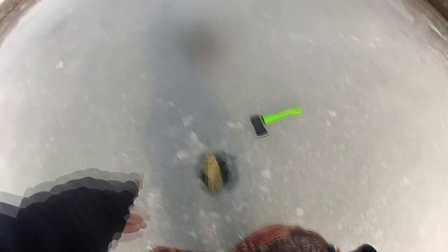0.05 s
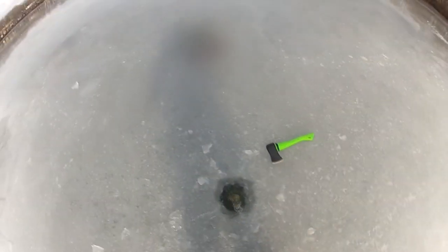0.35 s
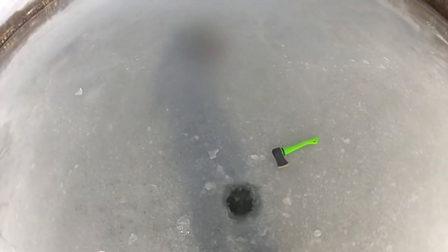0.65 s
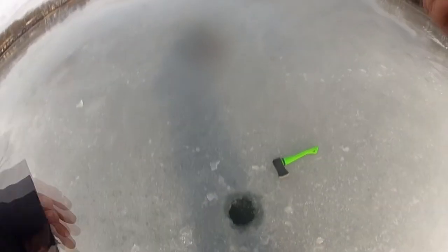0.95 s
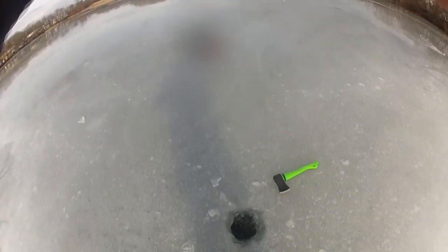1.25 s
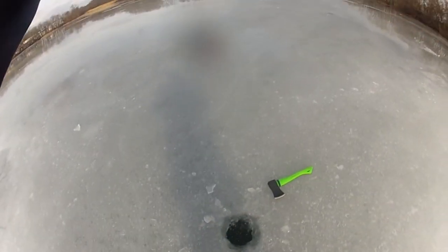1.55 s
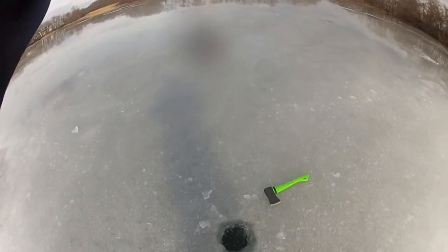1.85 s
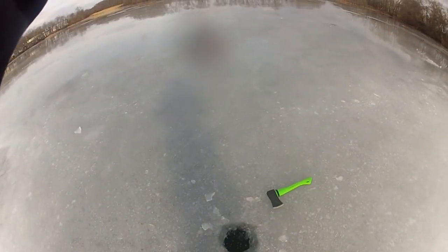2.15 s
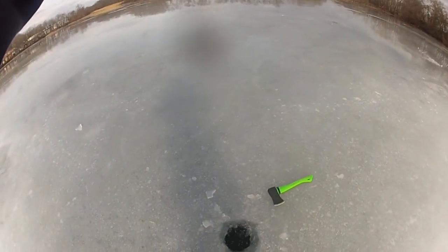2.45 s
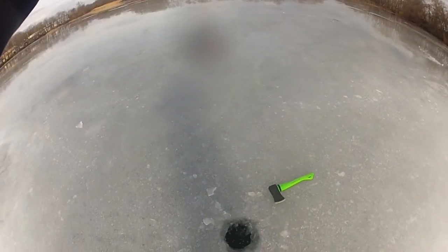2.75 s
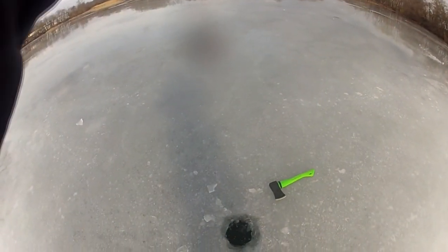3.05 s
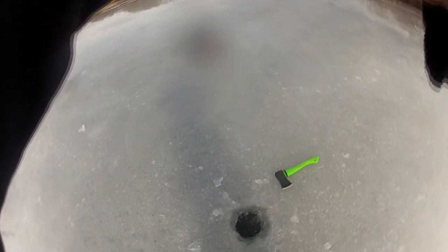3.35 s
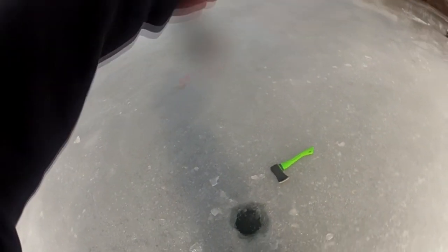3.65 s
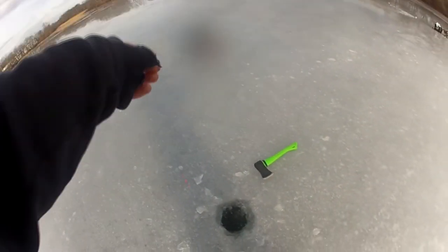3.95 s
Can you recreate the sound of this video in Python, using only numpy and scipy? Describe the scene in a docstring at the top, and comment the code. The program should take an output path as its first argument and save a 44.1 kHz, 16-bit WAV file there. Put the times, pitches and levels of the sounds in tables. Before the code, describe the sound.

One short, sloshing splash sounds as a fish drops through a hole in pond ice. Droplets patter down and thin out, leaving low, gusty wind buffeting the microphone over a faint distant hiss.

```python
"""Frozen pond, at a hole in the ice. A fish is let go: it slaps the water, the cavity sloshes and gulps,
spray patters down and a few drips follow. Wind buffets the body-worn microphone throughout, over a far
roar and hiss; a faint bird calls once, a low tone swells and a bump knocks the microphone.
The recorder clips on the strongest buffets and holds each sample at a low rate,
which mirrors the sound into the treble."""
import sys
import numpy as np
from scipy import signal
from scipy.fft import rfft, irfft
from scipy.io import wavfile
from scipy.ndimage import uniform_filter1d

SR = 44100
rng = np.random.default_rng(int(sys.argv[2]) if len(sys.argv) > 2 else 0)


def int16_out(signal):
    """Quantize to a 16-bit WAV file."""
    q = np.round(np.clip(np.atleast_2d(signal).T, -1, 1) * 32767)
    wavfile.write(sys.argv[1], SR, q.astype(np.int16))


N = 176400
T = np.arange(N) / SR
HZ = np.maximum(np.arange(N // 2 + 1) * SR / N, 1)
HOLD_RATE_HZ = 12000


def from_db(db):
    """Decibels to gain."""
    return 10 ** (np.asarray(db) / 20)


def unit_rms(x):
    """Scale to rms 1."""
    return x / np.sqrt(np.mean(x ** 2) + 1e-20)


def curve(rows):
    """Linear interpolation of (time_s, value) rows."""
    return np.interp(T, *np.transpose(rows))


def coloured(x, colour, tilt_db_per_octave=0):
    """Filter by (freq_hz, gain_db) rows plus a tilt; rms 1."""
    hz, db = np.transpose(colour)
    shape_db = np.interp(np.log(HZ), np.log(hz), db) + tilt_db_per_octave * np.log2(HZ)
    return unit_rms(irfft(rfft(x) * from_db(shape_db), N))


def noise():
    """White noise."""
    return rng.standard_normal(N)


def narrow_noise(hz, width_hz):
    """Gaussian band of noise; rms 1."""
    band = np.exp(-0.5 * ((HZ - hz) / (width_hz / 2)) ** 2)
    return unit_rms(irfft(rfft(noise()) * band, N))


def evened(x, window_s):
    """Divide by the running rms to flatten chance swells."""
    size = max(int(window_s * SR), 3)
    power = uniform_filter1d(uniform_filter1d(x ** 2, size), size)
    return x / np.sqrt(np.abs(power) + 1e-12)


def swell(middle_s, length_s):
    """Bell-shaped envelope."""
    return np.exp(-np.minimum((2 * (T - middle_s) / length_s) ** 2, 40))


def burst(start_s, decay_ms):
    """Instant attack, exponential decay."""
    return (T >= start_s) * np.exp(-np.clip((T - start_s) * 1000 / decay_ms, 0, 40))


def bubble(start_s, hz, t60_s):
    """Ringing air pocket: a damped sine that climbs in pitch."""
    rise_per_t60, attack_s = 0.087, 0.00052
    age_s = np.clip(T - start_s, 0, 2 * t60_s)
    phase = 2 * np.pi * hz * age_s * (1 + rise_per_t60 * age_s / t60_s / 2)
    return np.sin(phase) * from_db(-60 * age_s / t60_s) * (1 - np.exp(-age_s / attack_s))


def wind():
    """Fluttering rumble of wind on the microphone port."""
    # time_s, level_db
    strength = [(0, -25), (0.15, -31), (0.3, -31), (0.45, -26), (0.7, -20.5), (0.88, -31), (1.1, -23.5),
                (1.27, -25), (1.55, -22.5), (1.9, -17), (2.06, -21.5), (2.4, -22), (2.65, -20.5),
                (3.0, -22.5), (3.3, -22.5), (3.52, -21.5), (3.8, -14.5), (4, -17.5)]
    # freq_hz, gain_db
    colour = [(12, -20), (25, 0), (65, 3.5), (115, 0), (160, -3), (205, -8), (280, -8.5), (480, -24),
              (900, -35), (2000, -58.5), (5500, -61.5)]
    flutter_db = 3 * narrow_noise(0, width_hz=27.4)
    rumble = evened(coloured(noise(), colour), window_s=0.054)
    return rumble * from_db(curve(strength) + flutter_db)


def buffets():
    """Single eddies thump against the microphone."""
    # middle_s, length_s, level_db, tilt_db_per_octave
    eddies = [(0.042, 0.069, -26.5, -4), (0.578, 0.043, -8.5, -4.5), (0.608, 0.039, -9.5, 1),
              (0.716, 0.048, -18.5, 2), (0.992, 0.047, -14, -5), (1.13, 0.092, -15.5, -0.5),
              (1.448, 0.024, -6.5, -2.5), (1.693, 0.023, -5.5, -3.5), (1.747, .05, -6.5, -0.5),
              (1.806, 0.026, -5, -3), (1.983, 0.036, -15.5, -2.5), (2.164, 0.056, -15.5, 1.5),
              (2.265, 0.03, -11, 2.5), (2.801, 0.023, -11, 0), (2.866, 0.043, -10.5, 0.5),
              (3.35, 0.029, -12, 0), (3.397, 0.037, -16.5, 0), (3.655, 0.03, -6, 1.5),
              (3.745, 0.12, -14.5, -0.5), (3.86, 0.059, -11.5, -0.5)]
    # freq_hz, gain_db
    colour = [(12, -31), (25, -3), (65, 3.5), (150, -1.5), (300, -12.5), (480, -25.5), (900, -44.5),
              (2000, -65), (5500, -84)]
    out = 0
    for middle_s, length_s, db, tilt in eddies:
        rumble = evened(coloured(noise(), colour, tilt), window_s=0.041)
        out += from_db(db) * swell(middle_s, length_s) * rumble
    return out


def far_roar():
    """Wind in the trees along the shore."""
    # time_s, level_db
    levels = [(0, -27), (0.2, -37), (0.8, -32.5), (1.3, -39), (2.4, -40), (3.1, -35.5), (4, -38)]
    return from_db(curve(levels)) * evened(narrow_noise(hz=342, width_hz=147), window_s=0.038)


def far_hiss():
    """Dull distant hiss, drifting in level."""
    # time_s, level_db
    levels = [(0, -31.5), (0.8, -33.5), (1.5, -34.5), (2.5, -36), (3.3, -34.5), (4, -37)]
    # freq_hz, gain_db
    colour = [(60, 1), (380, 1), (520, -6.5), (800, -7.5), (1350, -15), (1800, -22.5), (2500, -28),
              (3500, -32.5), (4700, -31), (5800, -37)]
    return from_db(curve(levels)) * coloured(noise(), colour)


def drips():
    """Each drip: a wet tick with a small bubble ringing under it."""
    # start_s, level_db, pitch_hz, decay_ms
    drops = [(0.1052, -31, 4220, 1.5), (0.1191, -31, 3700, 1.3), (0.3587, -31, 4640, 3.3),
             (0.368, -33, 3170, 2), (0.4180, -34.5, 1950, 3), (0.4260, -35.5, 4450, 5.5),
             (0.4343, -33.5, 4100, 2.5), (0.4490, -43, 4500, 3), (0.4630, -46, 5100, 4),
             (0.4894, -31, 1580, 1.5), (0.5180, -32.5, 5600, 5.6), (0.562, -24, 4650, 2.6),
             (0.568, -34, 1980, 4.9), (0.5770, -42.5, 3450, 13), (0.622, -36.5, 5500, 2.2),
             (0.6318, -30, 3800, 1.6), (0.6800, -49, 3870, 4), (0.7220, -45, 3770, 3.6),
             (0.749, -46, 5540, 4.8), (0.8220, -51, 4600, 8.7), (1.1260, -47, 5600, 3),
             (1.3210, -47, 4500, 4.3), (1.4030, -48, 4600, 2.6), (1.7960, -45.5, 3530, 2.3),
             (2.471, -44, 2900, 2.8), (2.849, -45, 5200, 1.8), (3.604, -46.5, 3730, 1.6),
             (3.948, -48, 4150, 3.3)]
    half_width_octaves, tick_db, ring_db = 0.36, -0.5, 0.5
    spectrum = rfft(noise()) * (HZ < HOLD_RATE_HZ / 2)
    out = 0
    for start_s, db, hz, decay_ms in drops:
        band = 1 / (1 + (np.log2(HZ / hz) / half_width_octaves) ** 2)
        tick = unit_rms(irfft(spectrum * band, N)) * burst(start_s, decay_ms)
        ring = bubble(start_s, hz, t60_s=5.7 * decay_ms / 1000)
        out += from_db(db + tick_db) * tick + from_db(db + ring_db) * ring
    return out


def gulps():
    """Trapped air pockets ring as the cavity closes."""
    # start_s, pitch_hz, level_db, t60_s
    pockets = [(0.2275, 400, -9, 0.01), (0.2318, 970, -22, 0.01), (0.242, 1380, -18, 0.016),
               (0.251, 920, -24, 0.035), (0.269, 842, -12, 0.03), (0.2705, 598, -17, 0.037),
               (0.2795, 1097, -13, 0.017), (0.279, 1420, -17.5, .025), (0.2885, 582, -16, 0.03),
               (0.29, 1260, -22, 0.024), (0.2970, 1540, -23, 0.027)]
    return sum(from_db(db) * bubble(start_s, hz, t60_s) for start_s, hz, db, t60_s in pockets)


def droplets(rate_per_s, spread_db, t60_cycles):
    """Tiny drops of random size and timing, each ringing at one of 24 pitches."""
    sizes = from_db(spread_db * np.minimum(rng.exponential(1, N), 4))
    impacts = sizes * rng.choice([-1, 1], N) * (rng.random(N) < rate_per_s / SR)
    pitches_hz = np.geomspace(1100, 5800, num=24)
    pitch_index = rng.integers(0, len(pitches_hz), N)
    out = 0
    for k, hz in enumerate(pitches_hz):
        radius = np.exp(-np.log(1000) * hz / (t60_cycles * SR))
        angle = 2 * np.pi * hz / SR
        poles = [1, -2 * radius * np.cos(angle), radius ** 2]
        out += hz * signal.lfilter([0, np.sin(angle)], poles, impacts * (pitch_index == k) + 1e-18)
    return out


def spray():
    """A dense shower swells and dies fast; a thin patter lingers on ice and water."""
    # freq_hz, gain_db
    colour = [(500, -24), (1400, -9), (1950, -5.5), (2400, -12), (3100, -0.5), (4200, 4), (5000, 4),
              (5800, 1.5)]
    start_s, attack_s, crest_s = 0.228, 0.008, 0.32
    shower_fall_db_per_s, patter_fall_db_per_s = 343, 25.5
    onset = np.clip((T - start_s) / attack_s, 0, 1)
    tail_s = np.maximum(T - crest_s, 0)
    shower_db = np.interp(T, [start_s, crest_s], [-31.5, -25]) - shower_fall_db_per_s * tail_s
    patter_db = -49.5 - patter_fall_db_per_s * tail_s
    shower = coloured(droplets(rate_per_s=1800, spread_db=4, t60_cycles=32), colour)
    patter = coloured(droplets(rate_per_s=600, spread_db=3.5, t60_cycles=24), colour)
    return onset * (evened(shower, window_s=0.025) * from_db(shower_db) + patter * from_db(patter_db))


def slaps():
    """The fish's body hits the water: short, bright noise bursts."""
    # start_s, level_db, decay_ms
    hits = [(0.2287, -7.5, 1.65), (0.2320, -12.5, 1.3), (0.24, -10, 2.7), (0.2457, -14, 2),
            (0.2585, -24, 3), (0.2704, -7, 0.98), (0.291, -13.5, 1.0), (0.3022, -20, 3),
            (0.3302, -15.5, 2.9)]
    # freq_hz, gain_db
    colour = [(150, -8), (600, 4), (1400, -1), (2350, -6.5), (3200, 3.5), (4600, 9.5), (5800, -1.5)]
    envelope = sum(from_db(db) * burst(start_s, decay_ms) for start_s, db, decay_ms in hits)
    return envelope * evened(coloured(noise(), colour), window_s=0.0016)


def slosh():
    """The closing cavity sloshes hollowly in the hole."""
    # start_s, level_db, decay_ms
    surges = [(0.2312, -27.5, 11), (0.2703, -29, 9), (0.279, -27, 12)]
    # freq_hz, gain_db
    colour = [(300, -18), (570, 1), (700, -2), (860, 0), (1450, 0), (1700, -18), (3000, -26)]
    envelope = sum(from_db(db) * burst(start_s, decay_ms) for start_s, db, decay_ms in surges)
    return envelope * evened(coloured(noise(), colour), window_s=0.006)


def bird():
    """One far call: a whistle overlapping a higher buzz."""
    # middle_s, length_s, pitch_hz, width_hz, level_db
    notes = [(2.04, .14, 3420, 20, -63.5), (2.093, 0.26, 4670, 450, -61)]
    return sum(from_db(db) * swell(middle_s, length_s) * evened(narrow_noise(hz, width_hz), 0.036)
               for middle_s, length_s, hz, width_hz, db in notes)


def low_tone():
    """A low tone swells and fades in the wind."""
    tone = evened(narrow_noise(hz=156, width_hz=5.6), window_s=0.12)
    return from_db(-24) * swell(middle_s=3, length_s=1) * tone


def bump():
    """One dull knock against the microphone."""
    # freq_hz, gain_db
    colour = [(40, -2), (120, 0.5), (270, -1), (480, -26), (900, -38), (1900, -42), (3000, -55),
              (5500, -64)]
    start_s, level_db, decay_ms = 3.6555, -7, 7
    knock = coloured(noise() * burst(start_s, decay_ms), colour)
    burst_rms = np.sqrt(decay_ms / 2000 * SR / N)  # refers level_db to the onset
    return from_db(level_db) * burst_rms * knock


def scene():
    """All sources at one microphone."""
    air = wind() + buffets() + far_roar() + far_hiss()
    water = drips() + gulps() + spray() + slaps() + slosh()
    return (air + water + bird() + low_tone() + bump())[None]


def record(dry):
    """Clip, low-pass, sample and hold (mirror images in the treble), top cut, clip."""
    input_lowpass = signal.butter(N=16, Wn=5560, fs=SR, output="sos")
    top_cut = signal.ellip(N=10, rp=0.2, rs=80, Wn=15250, fs=SR, output="sos")
    steps_per_hold = 4
    fine_rate_hz = steps_per_hold * HOLD_RATE_HZ
    filtered = signal.sosfilt(input_lowpass, np.clip(dry, -1, 1))
    fine = signal.resample_poly(filtered, fine_rate_hz, SR, axis=1)
    staircase = np.repeat(fine[:, ::steps_per_hold], steps_per_hold, axis=1)
    held = signal.resample_poly(staircase, SR, fine_rate_hz, axis=1)[:, :N]
    return np.clip(signal.sosfilt(top_cut, held), -1, 1)


dry = scene()
out = record(dry)
int16_out(out)
```